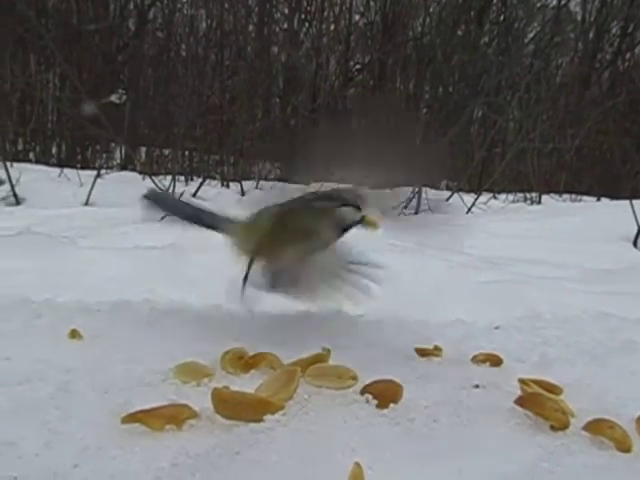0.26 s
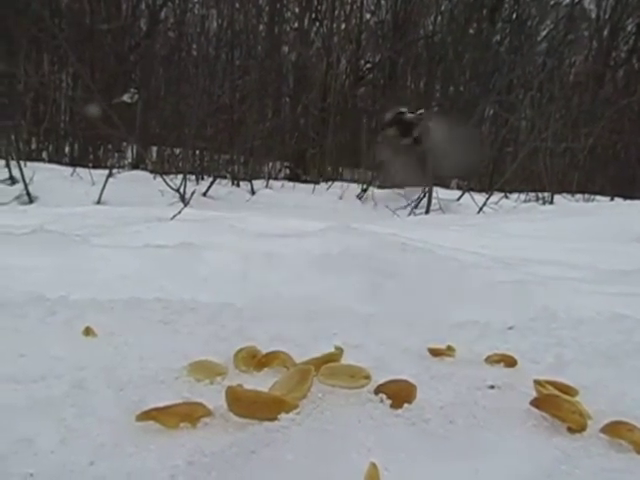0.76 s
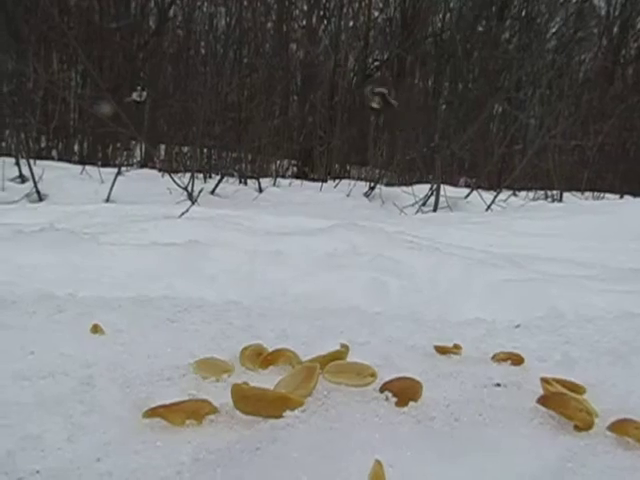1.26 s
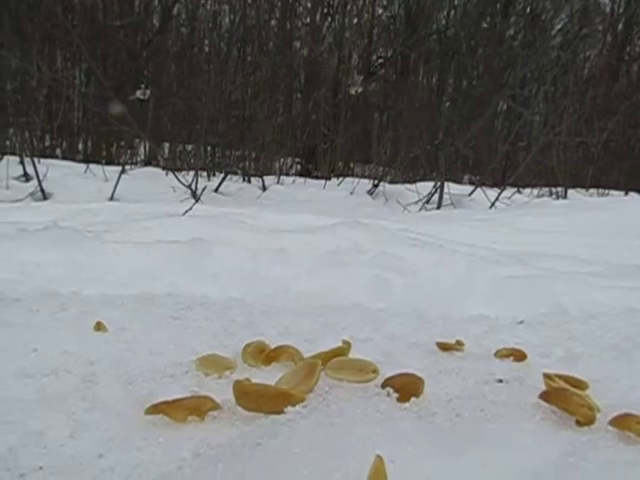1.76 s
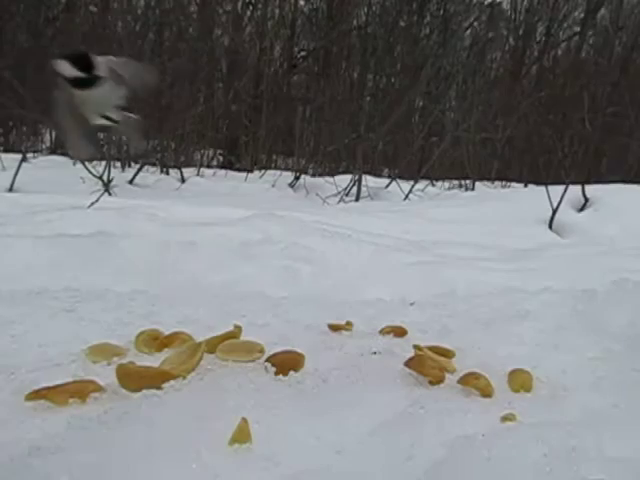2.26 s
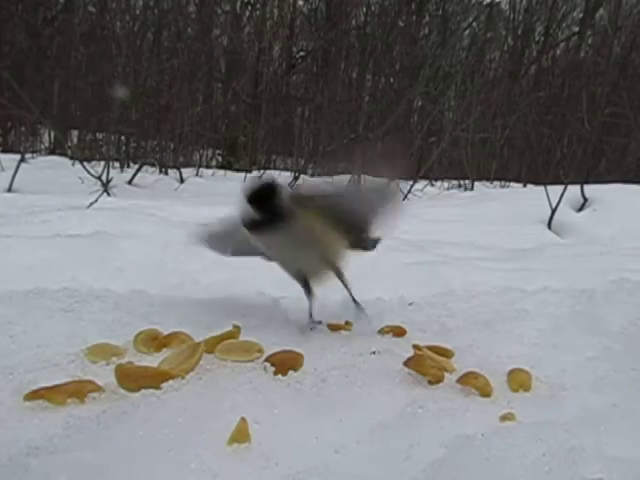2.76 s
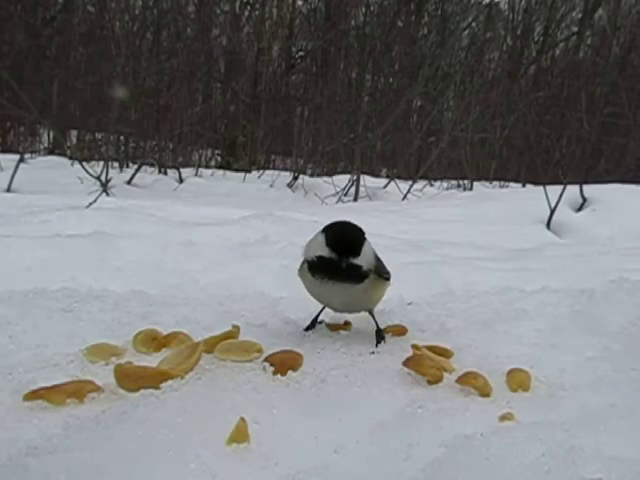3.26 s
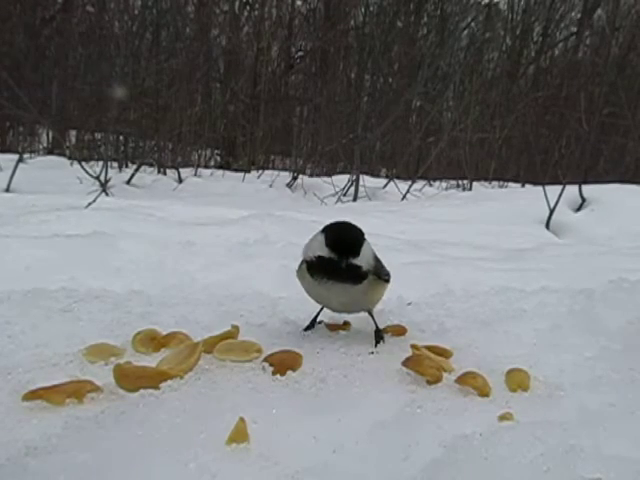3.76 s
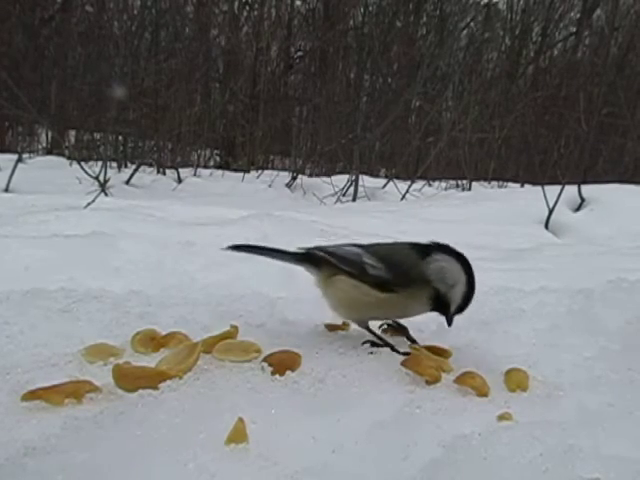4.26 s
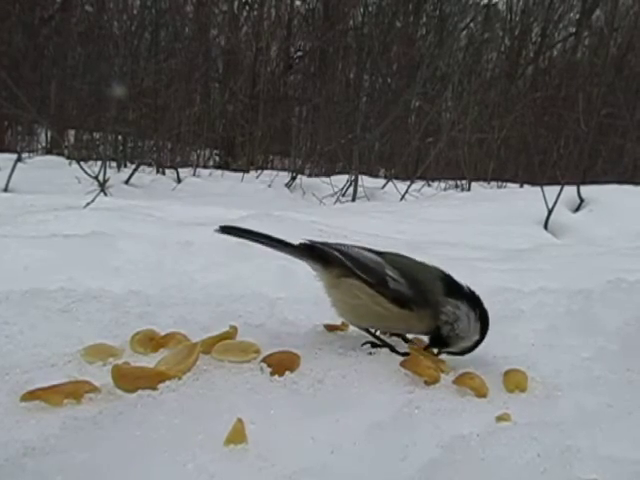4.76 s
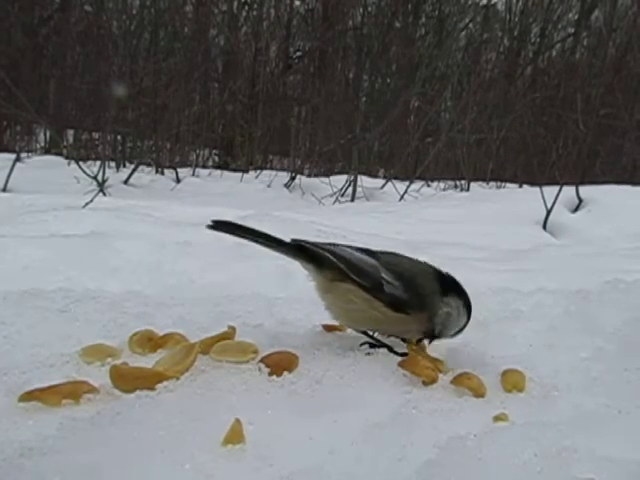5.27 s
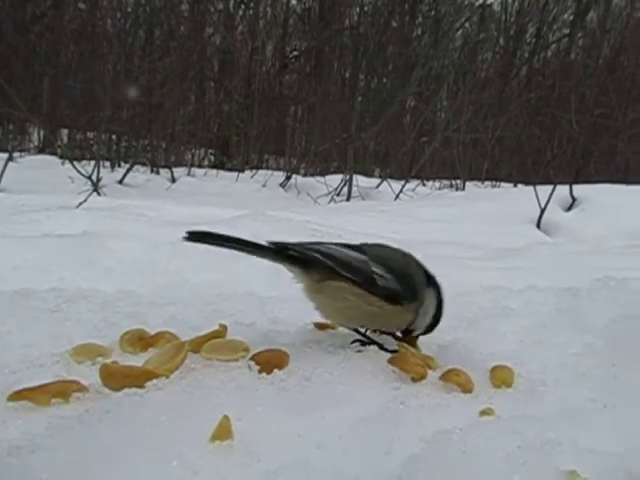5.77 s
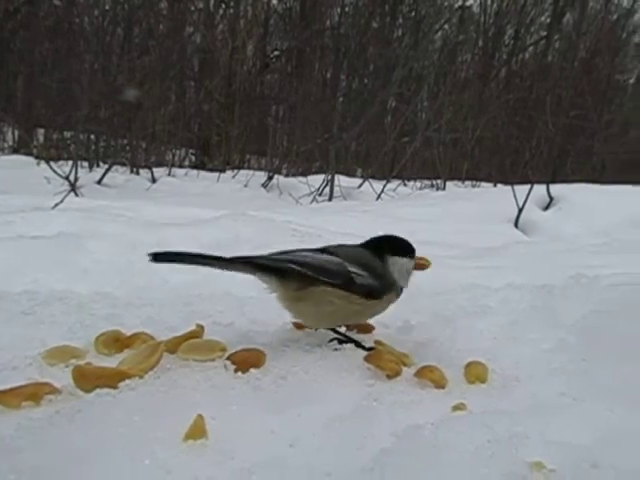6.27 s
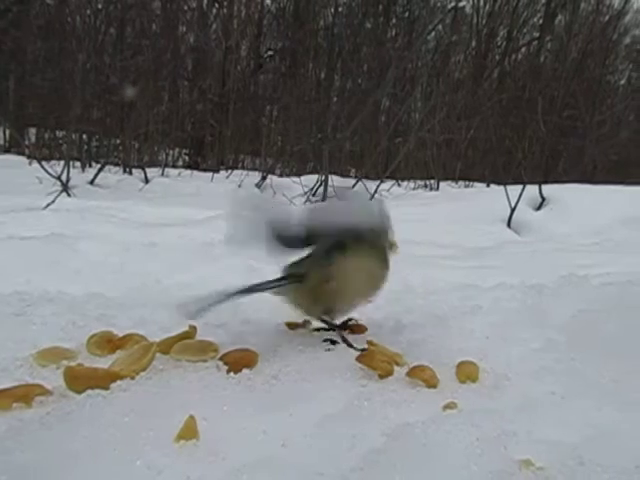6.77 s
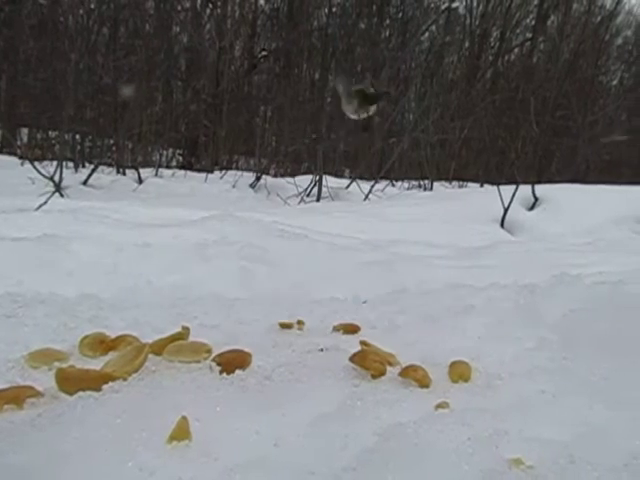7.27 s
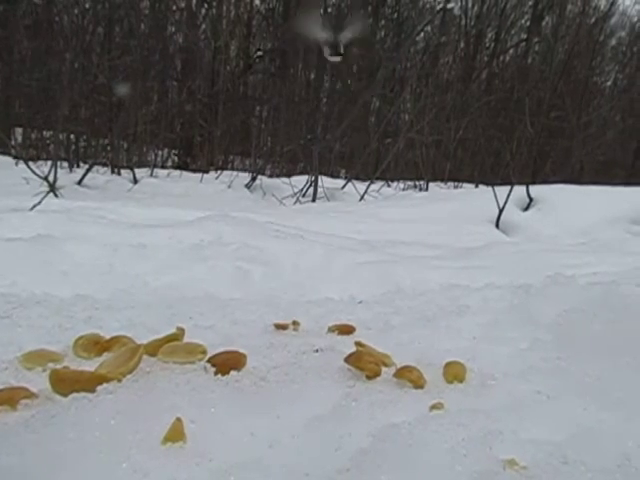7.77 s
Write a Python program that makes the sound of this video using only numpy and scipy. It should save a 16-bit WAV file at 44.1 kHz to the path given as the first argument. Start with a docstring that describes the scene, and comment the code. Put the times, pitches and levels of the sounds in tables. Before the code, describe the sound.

Quiet snowy wood with soft air hiss and a deep distant rumble. After a barely audible contact note and dry ticks, chickadees give four calls. Each opens with two very high, quick whistles dropping in pitch, then three or four hoarse, nasal dees. The third is a little fainter; tiny notes and ticks return before the last. Fairly close microphone, faint echoes, a slightly gritty digital edge on the notes.

```python
"""Still air hisses softly over a far rumble; a thin contact note and a few dry ticks come before the first call.
Four chickadee calls are heard in a snowy wood, the last with the notes of the first: two arched whistles
("chick-a"), each one gliding sine, then hoarse "dees", harmonic stacks and hiss coloured by throat and beak.
Note and ticks are heard again before the last call. Snow, twigs and trunks give faint echoes and a short tail.
The recorder repeats samples to raise its rate, which puts a ladder of side tones round every note."""
import sys
import numpy as np
from scipy import signal
from scipy.fft import rfft, irfft, next_fast_len
from scipy.io import wavfile

SR = 44100
rng = np.random.default_rng(int(sys.argv[2]) if len(sys.argv) > 2 else 0)


def persist_wave(psi):
    """Save psi, clipped to +-1, as 16-bit WAV."""
    counts = np.round(np.clip(psi, -1, 1) * 32767).astype(np.int16)
    wavfile.write(sys.argv[1], SR, np.atleast_2d(counts).T)


N = 354123   # length [samples]

# shared by the chick and the contact note: glide time constant, level change over the note, random level spread
CHICK_GLIDE_S, CHICK_SWELL_DB, CHICK_FLUTTER_DB = .0035, 2.5, 2.5


def from_db(db):
    """Amplitude ratio: 20 dB is a factor of ten."""
    return 10 ** (np.asarray(db) / 20)


def rms_one(x):
    """Normalization to unit root mean square."""
    return x / np.sqrt(np.mean(x ** 2) + 1e-20)


def in_time(rows):
    """Linear interpolation of (time, value) points at every sample."""
    return np.interp(np.arange(N) / SR, *np.transpose(rows))


def stretch(start, end, ease):
    """Trapezoidal envelope: 1 between start and end, easing in before and out after."""
    return in_time([(start - ease, 0), (start, 1), (end, 1), (end + ease, 0)])


def at_hz(points, hz):
    """Spectrum [dB] interpolated on a logarithmic frequency axis."""
    f, db = np.transpose(points)
    return np.interp(np.log(np.maximum(hz, 1)), np.log(f), db)


def noise(spectrum, size):
    """Spectral shaping: white noise is weighted bin by bin; rms 1."""
    padded = next_fast_len(size, real=True)
    hz = np.arange(padded // 2 + 1) * SR / padded
    white_bins = rfft(rng.standard_normal(padded))
    shaped = irfft(white_bins * from_db(at_hz(spectrum, hz)), padded)
    return rms_one(shaped[:size])


def waver(rate_hz, size):
    """Random modulation: noise low-passed at the given rate; rms 1."""
    b, a = signal.butter(2, rate_hz, fs=SR)
    moved = signal.lfilter(b, a, rng.standard_normal(2 * size))
    return rms_one(moved[size:])   # the first half lets the filter settle


def add(out, s, sound):
    """Superposition: mixes a sound in at time s."""
    i = round(s * SR)
    out[i:i + len(sound)] += sound[:max(N - i, 0)]


def air():
    """Broadband noise: a soft, even hiss that lifts a little for two stretches."""
    # hiss spectrum: (frequency [Hz], relative level [dB])
    hiss_spectrum = [(59, -30.5), (100, -7), (118, -2.5), (177, -5), (319, -6), (362, -7), (627, -7),
                     (1020, -10.5), (1210, -10.5), (2130, -11.5), (9540, -25), (12600, -27.5),
                     (15500, -46.5)]
    # stretches of stronger hiss: (start [s], end [s])
    lifts = [(1.95, 4.65), (7.06, 8.03)]
    level_db, lift_db, ease_s = -72.5, 2, 0.11
    lifted = sum(stretch(start, end, ease_s) for start, end in lifts)
    return from_db(level_db + lift_db * lifted) * noise(hiss_spectrum, N)


def rumble():
    """Low-frequency noise: a far, deep rumble with one lull."""
    # rumble spectrum: (frequency [Hz], relative level [dB])
    rumble_spectrum = [(12, -5), (22, -6.5), (30, -1), (34.5, 4.5), (39, -7), (46, -3.5), (55, -15),
                       (64, -14), (68.5, -4), (73, -17.5), (98, -28), (140, -32), (250, -71)]
    # the quieter stretch: (start [s], end [s])
    lull = (3.15, 4.45)
    level_db, lull_db, ease_s = -55, -3.5, 0.47
    return from_db(level_db + lull_db * stretch(*lull, ease_s)) * noise(rumble_spectrum, N)


def whistle(length, top_hz, rise_hz, fall_hz, glide, level_db, swell_db, flutter_db, arch_hz=260,
            attack=0.015, release=0.0036, jitter_hz=18, ragged_hz=450, ragged_db=2.5, ragged_s=0.0072):
    """Frequency modulation: one side of the syrinx scoops up, arches, then plunges, ragged as the tension lets go."""
    t = np.arange(int(length * SR)) / SR
    u = t / length
    slack = np.exp((t - length) / ragged_s)
    arch = top_hz - arch_hz * (2 * u - 1) ** 2
    hz = arch - rise_hz * np.exp(-t / glide) - fall_hz * np.exp((t - length) / glide)
    hz = hz + (jitter_hz + ragged_hz * slack) * waver(910, len(t))
    onset = attack * (0.054 + (rise_hz / 1500) ** 2)   # a deep scoop starts softly
    gate = np.clip(t / onset, 0, 1) * np.clip((length - t) / release, 0, 1)
    smooth_db = level_db + swell_db * (u - .5) + flutter_db * waver(55, len(t))
    gain = from_db(smooth_db + ragged_db * slack * (1 + waver(600, len(t))))
    return np.sqrt(2) * gain * gate * np.sin(2 * np.pi * np.cumsum(hz) / SR)


def contact_notes():
    """Frequency modulation on a tiny scale: thin notes, each a very short chick."""
    # (time [s], level [dB])
    contacts = [(1.475, -73), (6.586, -70.5)]
    length_s, top_hz, rise_hz, fall_hz = .009, 7650, 700, 900
    out = np.zeros(N)
    for s, level_db in contacts:
        add(out, s, whistle(length_s, top_hz, rise_hz, fall_hz, CHICK_GLIDE_S, level_db,
                            CHICK_SWELL_DB, CHICK_FLUTTER_DB))
    return out


def ticks(decay=.004):
    """Impulsive excitation: each soft tick in the twigs is a noise burst that dies exponentially."""
    # (time [s], onset level [dB])
    tick_times = [(1.707, -65), (1.745, -65), (1.785, -64), (6.816, -65.5), (6.855, -64), (6.895, -66)]
    spectrum = [(500, 6), (3000, 2.5), (7000, -3.5), (15000, -16)]   # (frequency [Hz], relative level [dB])
    out, t = np.zeros(N), np.arange(SR // 20) / SR
    for s, level_db in tick_times:
        burst = np.exp(-t / decay) * noise(spectrum, len(t))
        add(out, s - decay / 2, from_db(level_db) * burst)
    return out


def with_repeat(notes):
    """Repetition by time shift: the notes of the first call are heard again, note for note, 5.111 s later."""
    first_call_ends_s, repeat_after_s = 3.0, 5.111
    again = [(s + repeat_after_s, *note) for s, *note in notes if s < first_call_ends_s]
    return list(notes) + again


def chicks():
    """Pitch glide: the high opening "chick" of each call plunges at its end."""
    # (time [s], length [s], top pitch [Hz], opening rise [Hz], level [dB])
    chick_notes = [(2.177, 0.071, 7574, 727, -40.5), (3.407, 0.056, 7540, 50, -35.5),
                   (5.402, .076, 7594, 747, -41.5)]
    fall_hz = 3570
    out = np.zeros(N)
    for s, length, top_hz, rise_hz, level_db in with_repeat(chick_notes):
        add(out, s, whistle(length, top_hz, rise_hz, fall_hz, CHICK_GLIDE_S, level_db,
                            CHICK_SWELL_DB, CHICK_FLUTTER_DB))
    return out


def a_notes():
    """Pitch glide: the lower, rounder "a" has a deep opening scoop and a slower glide."""
    # (time [s], length [s], top pitch [Hz], level [dB])
    a_table = [(2.289, 0.054, 6648, -33), (3.504, 0.053, 6600, -32.5), (5.513, .055, 6584, -42)]
    rise_hz, fall_hz, glide_s, swell_db, flutter_db = 1554, 2225, .0053, -4, 1.7
    out = np.zeros(N)
    for s, length, top_hz, level_db in with_repeat(a_table):
        add(out, s, whistle(length, top_hz, rise_hz, fall_hz, glide_s, level_db, swell_db, flutter_db))
    return out


def throat_db(f, beak_hz, bright_db, pinched, beak_db=7, beak_width_hz=450):
    """Source-filter colour: a fixed throat spectrum, a tilt per octave and one beak resonance."""
    # the open throat: (frequency [Hz], relative level [dB])
    open_throat = [(1000, -39), (1560, -8.5), (1980, 2), (2380, -8), (2770, -4.5), (3150, -2), (3550, -8),
                   (3950, -7), (4300, -3), (5100, 0.5), (5550, -4), (6300, -13), (7500, -18), (11000, -48)]
    # the pinched throat: (frequency [Hz], relative level [dB])
    pinched_throat = [(400, -31), (1200, -42.5), (1580, -31.5), (1980, -15.5), (2700, -15), (3150, -16),
                      (3550, 4), (4000, -3), (4400, -7), (4800, -17), (5500, -21), (6500, -38),
                      (11000, -53)]
    throat = (1 - pinched) * at_hz(open_throat, f) + pinched * at_hz(pinched_throat, f)
    beak = beak_db * np.exp(-.5 * ((f - beak_hz) / beak_width_hz) ** 2)
    return throat + bright_db * np.log2(f / 3500) + beak


def dee(length, top_hz, climb, level_db, start_hz, end_hz, pinched,
        scoop=.085, droop=0.093, jitter=0.0159, rasp=0.74, hiss=0.54, uneven_db=2.5):
    """Mode locking: both sides of the syrinx lock into one buzzing stack, ragged until they lock and as they part."""
    rest_hz = 381   # every dee sags back toward this pitch
    # a dee pushed above the resting pitch is cleaner and brighter (tilt in dB per octave)
    rest_rough, cleaner_per_hz, rest_tilt_db, tilt_db_per_hz = 0.64, 0.0089, -2.5, .07
    lock_s, part_s, opening_rough, closing_rough = .033, 0.01, 0.98, 0.76
    low_partials_hz, unlocked_low_db = 2400, -4.5   # the low partials wait for the lock
    wobble, wobble_hz = .003, 16.2   # unsteady pitch: share, rate
    dulling_db, fade_db = -2.5, -1   # as the air runs out, over one note: tilt per octave, level
    attack_s, release_s = 0.012, 0.012

    size = int(length * SR)
    t = np.arange(size) / SR
    u = t / length
    push_hz = top_hz - rest_hz
    unlocked, parting = np.exp(-(t / lock_s) ** 3), np.exp((t - length) / part_s)
    rough = rest_rough - cleaner_per_hz * push_hz + opening_rough * unlocked + closing_rough * parting
    rough = np.clip(rough, 0, 1.3)
    bright_db, pinched = rest_tilt_db + tilt_db_per_hz * push_hz, np.clip(pinched, 0, 1)

    # pitch climbs, sags, and drops as the air gives out
    rising = np.maximum(1 - t / climb, 0)
    falling = np.maximum(t - climb, 0) / (length - climb)
    hz = top_hz * (1 - scoop * rising ** 2 - droop * u ** 30) - push_hz * falling ** 1.1
    hz = hz * (1 + wobble * waver(wobble_hz, size) + jitter * rough * waver(170, size))
    phase = 2 * np.pi * np.cumsum(hz) / SR

    beak_hz = start_hz + (end_hz - start_hz) * u
    buzz = 0
    for k in range(1, 28):
        # the two sides' own tones, low in the stack, are steadier than their sum tones
        loose = min(k / 10, 1) ** 1.5
        depth = rasp * rough * loose
        random_turn = (waver(85, size) + 1j * waver(100, size)) / np.sqrt(2)
        shake = (1 + depth * random_turn) / np.sqrt(1 + depth ** 2)
        late_db = unlocked_low_db * unlocked * (k * top_hz < low_partials_hz)
        tilt_db = dulling_db * (u - .5) * np.log2(k * top_hz / 3500)
        colour_db = throat_db(k * hz, beak_hz, bright_db, pinched)
        gain = from_db(colour_db + late_db + tilt_db + uneven_db * loose * waver(7.6, size))
        start_phase = 2 * np.pi * rng.random()
        buzz = buzz + gain * np.real(shake * np.exp(1j * (k * phase + start_phase)))

    grid = np.geomspace(300, 14000, num=80)
    hiss_db = throat_db(grid, (start_hz + end_hz) / 2, bright_db, pinched)
    turbulence = noise(np.column_stack([grid, hiss_db]), size)
    voice = (rms_one(buzz) + hiss * rough * turbulence) / np.sqrt(1 + (hiss * rough) ** 2)
    envelope = (1 - np.exp(-t / attack_s)) * np.clip((length - t) / release_s, 0, 1)
    return from_db(level_db + fade_db * (u - .5)) * envelope * voice


def dees():
    """Harmonic stacks in succession: the run of hoarse notes that ends each call."""
    # (time [s], length [s], top pitch [Hz], climb to the top [s], level [dB],
    #  beak resonance at start [Hz], at end [Hz], pinched throat [0-1])
    dee_notes = [(2.364, 0.16, 404, 0.054, -47.5, 4300, 4000, 0.22),
                 (2.568, 0.17, 394.3, 0.089, -48, 4800, 2940, 0.02),
                 (2.784, 0.18, 402.5, 0.061, -46.5, 4140, 3400, 0.12),
                 (3.586, 0.16, 398.4, 0.069, -47.5, 3380, 3300, 0.18),
                 (3.793, 0.19, 398.8, 0.096, -49.5, 3200, 3260, 0.14),
                 (4.04, 0.17, 410, 0.099, -49.5, 3400, 3400, 0.15),
                 (4.266, .19, 417.8, .072, -49.5, 3530, 3670, 0.06),
                 (5.584, 0.16, 410.5, 0.057, -50.5, 4140, 3560, 0.73),
                 (5.781, .191, 399.4, 0.068, -48.5, 3850, 3570, 0.73),
                 (6.018, .19, 412, 0.072, -47.5, 3850, 3540, 0.67)]
    out = np.zeros(N)
    for s, *note in with_repeat(dee_notes):
        add(out, s, dee(*note))
    return out


def wood(x, twigs_db=-18, twigs_t60=0.099, trunks_db=-21, trunks_t60=0.35, dull_hz=4800):
    """Convolution reverberation: near echoes, a quick scatter from twigs and a duller tail from the trunks."""
    # near echoes: (delay [s], level relative to the direct sound [dB])
    echoes = [(.0031, -26.5), (.0058, -16.5), (.0094, -20), (0.0132, -15)]
    t = np.arange(SR) / SR
    twigs = rng.standard_normal(SR) * from_db(-60 * t / twigs_t60) * np.minimum(t / 0.0039, 1)
    trunks = rng.standard_normal(SR) * from_db(-60 * t / trunks_t60) * np.minimum(t / 0.0058, 1)
    low_pass = signal.butter(2, dull_hz, fs=SR, output="sos")
    trunks = signal.sosfilt(low_pass, trunks)   # long paths lose their treble
    tail = from_db(twigs_db) * rms_one(twigs) + from_db(trunks_db) * rms_one(trunks)
    response = tail / np.sqrt(SR)   # from rms to energy over the one-second response
    for delay, level_db in echoes:
        response[round(delay * SR)] += from_db(level_db)
    return x + signal.fftconvolve(x, response)[:N]


def scene():
    """Superposition: birds and ticks reverberate in the wood, over the air and the rumble."""
    birds = contact_notes() + chicks() + a_notes() + dees()
    return (wood(birds + ticks()) + air() + rumble())[None]


def record(dry):
    """Sampling-time error: a faster clock repeats samples, the sawtooth error makes side tones; then the top is cut."""
    clock_hz, cutoff_hz = 48000, 15800
    nearest_earlier = np.arange(N * clock_hz // SR) * SR // clock_hz
    stepped = signal.resample(dry[:, nearest_earlier], N, axis=1)
    low_pass = signal.ellip(12, .1, 80, cutoff_hz, fs=SR, output="sos")
    return signal.sosfilt(low_pass, stepped)


dry = scene()
out = record(dry)
persist_wave(out)
```